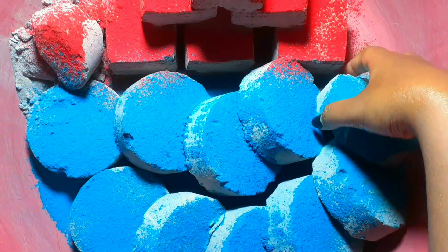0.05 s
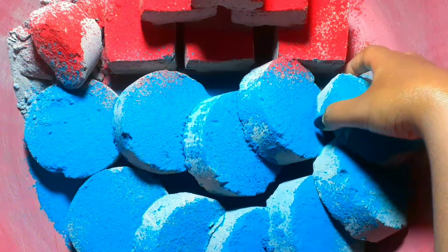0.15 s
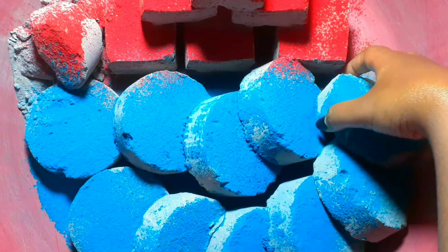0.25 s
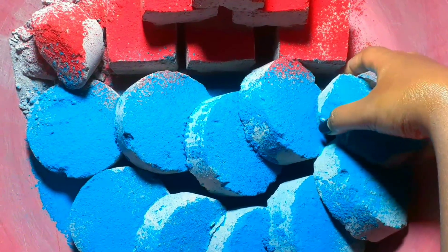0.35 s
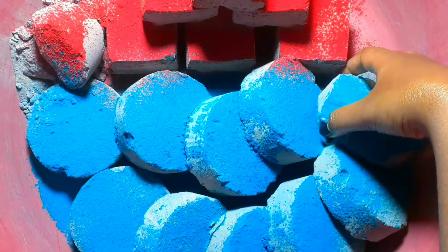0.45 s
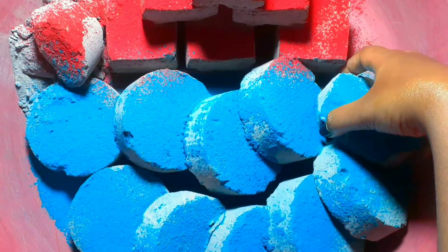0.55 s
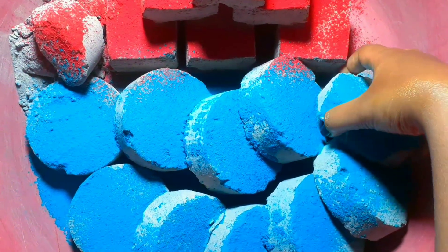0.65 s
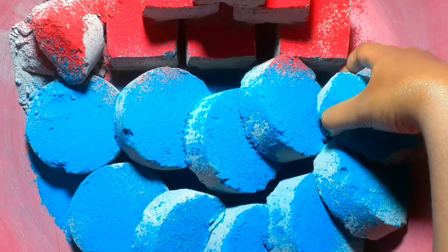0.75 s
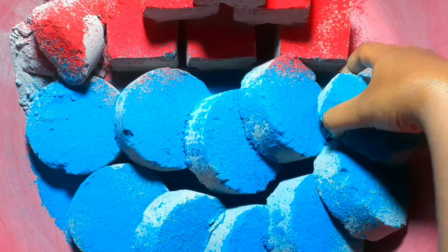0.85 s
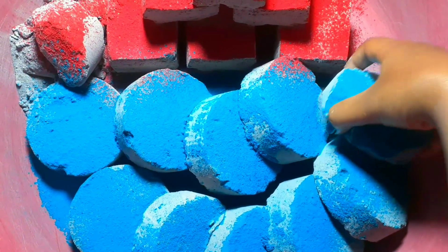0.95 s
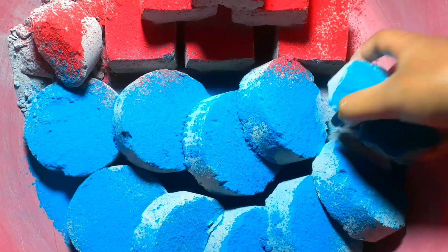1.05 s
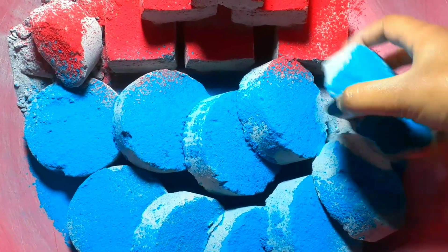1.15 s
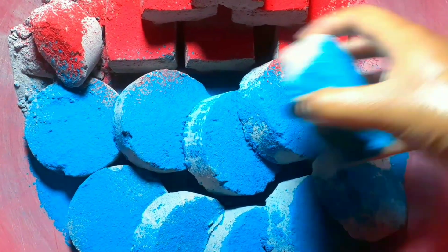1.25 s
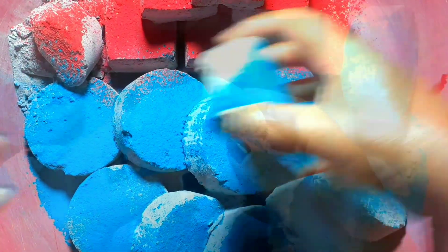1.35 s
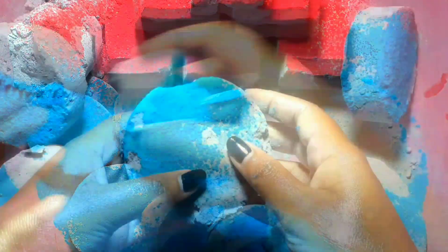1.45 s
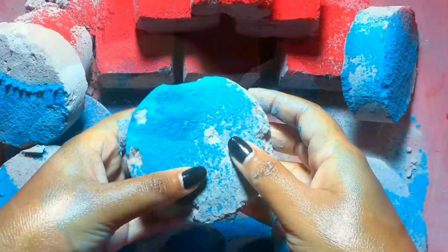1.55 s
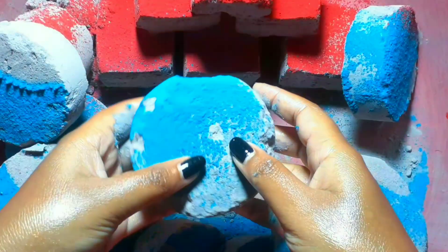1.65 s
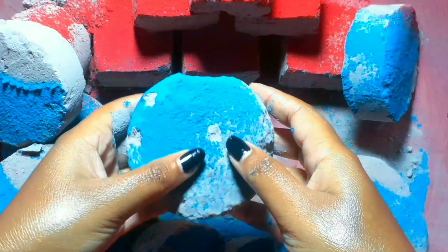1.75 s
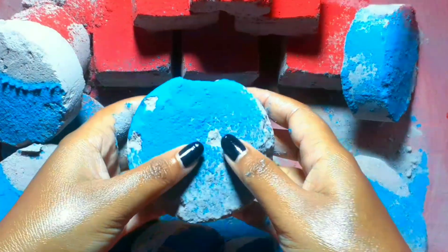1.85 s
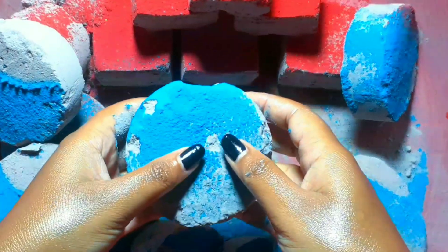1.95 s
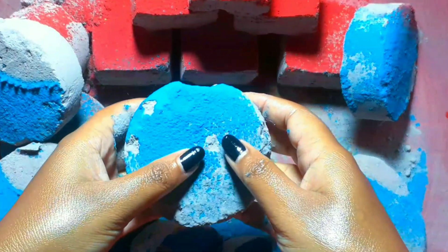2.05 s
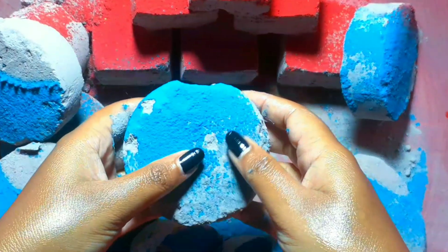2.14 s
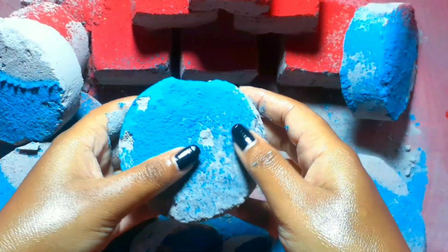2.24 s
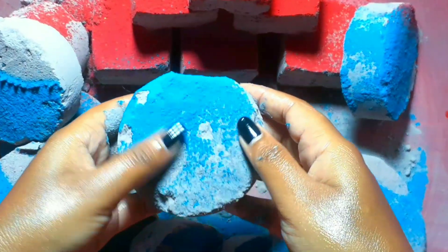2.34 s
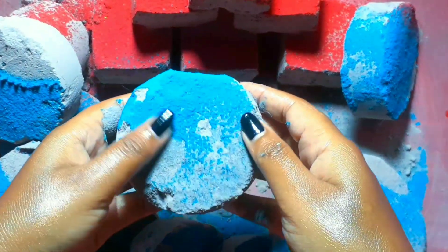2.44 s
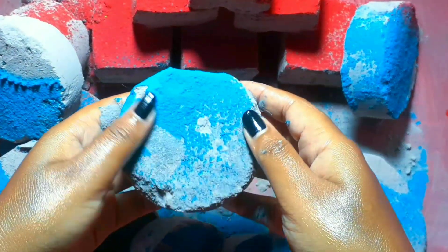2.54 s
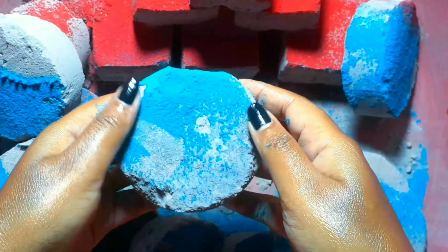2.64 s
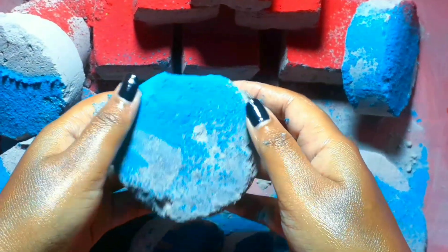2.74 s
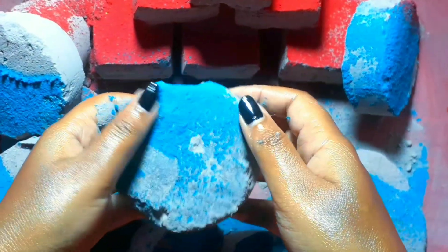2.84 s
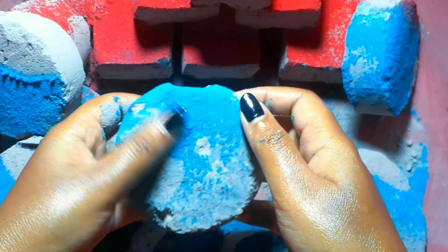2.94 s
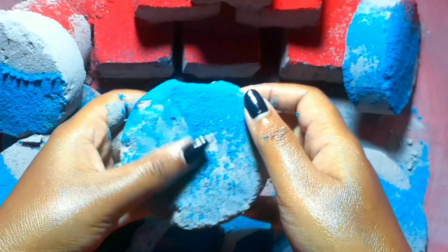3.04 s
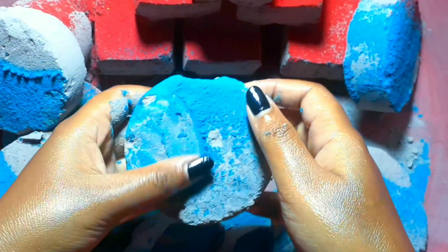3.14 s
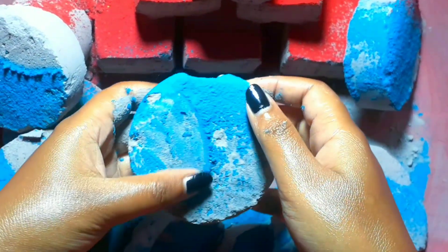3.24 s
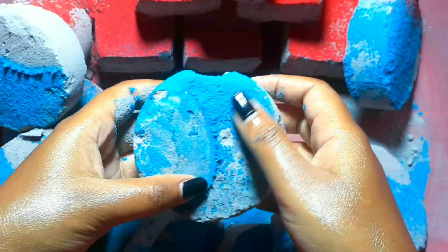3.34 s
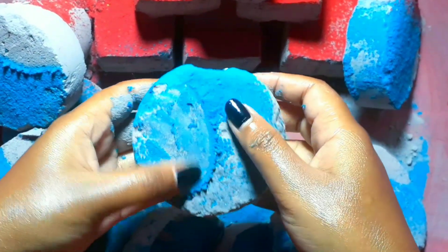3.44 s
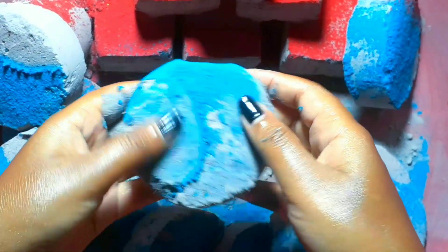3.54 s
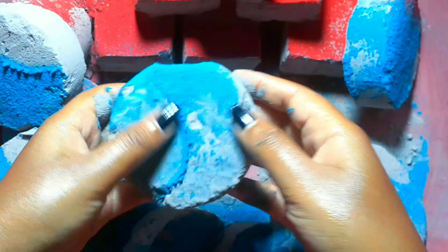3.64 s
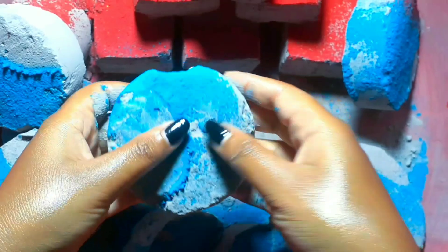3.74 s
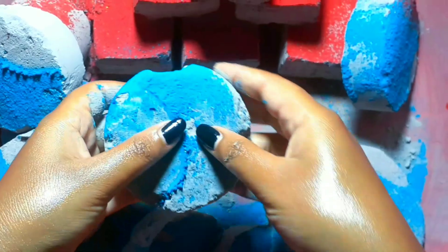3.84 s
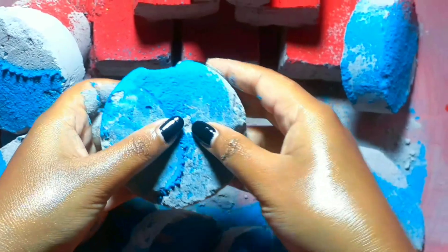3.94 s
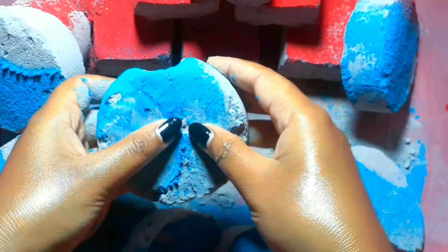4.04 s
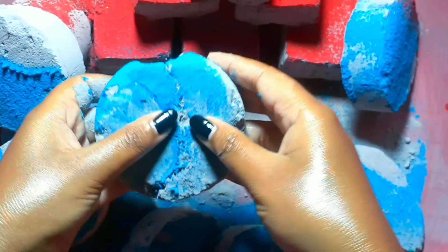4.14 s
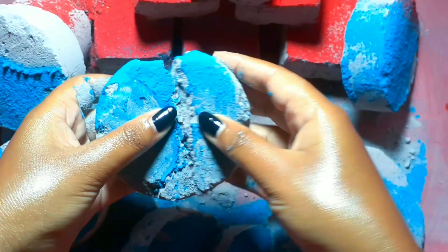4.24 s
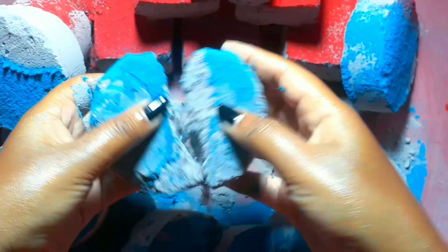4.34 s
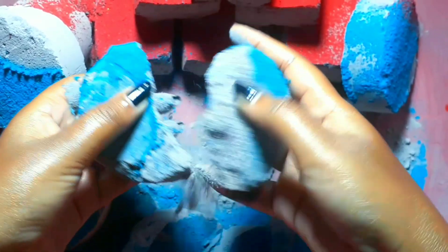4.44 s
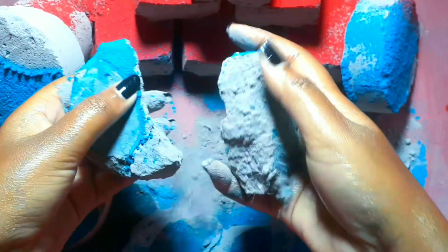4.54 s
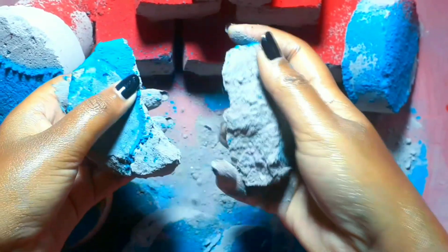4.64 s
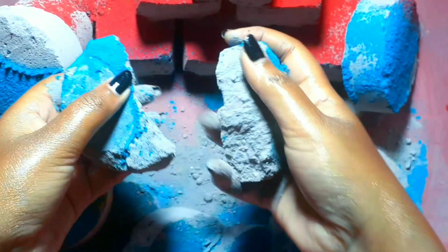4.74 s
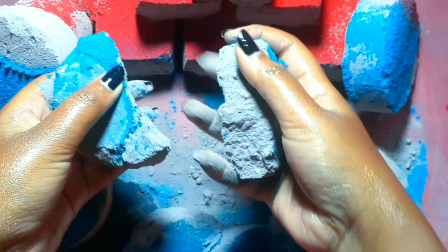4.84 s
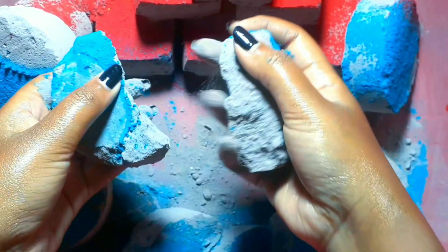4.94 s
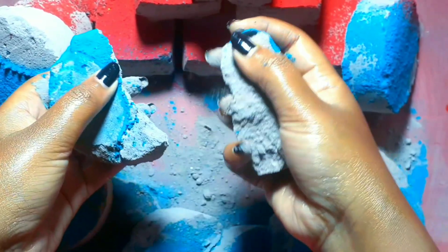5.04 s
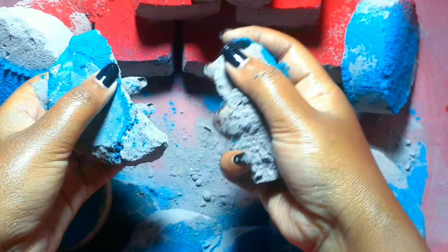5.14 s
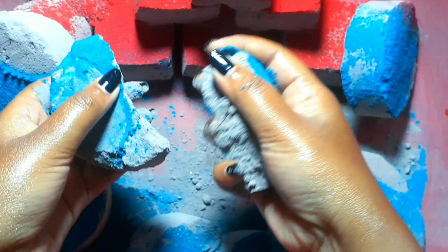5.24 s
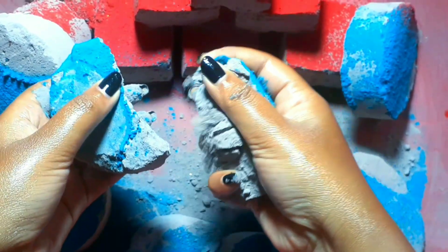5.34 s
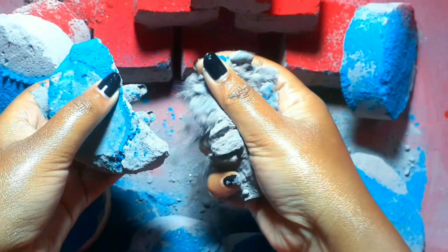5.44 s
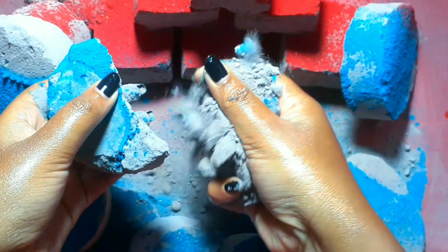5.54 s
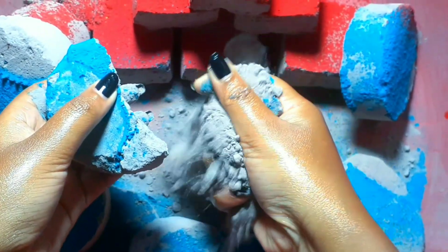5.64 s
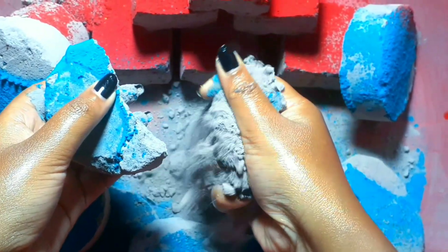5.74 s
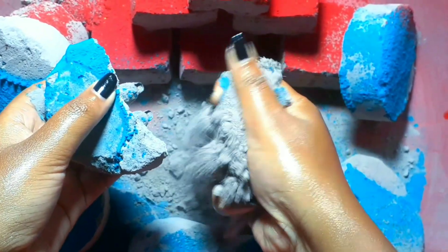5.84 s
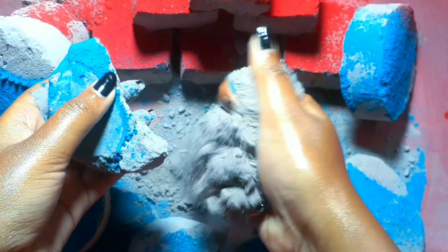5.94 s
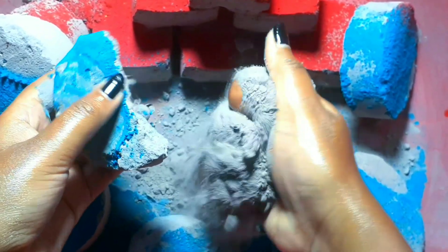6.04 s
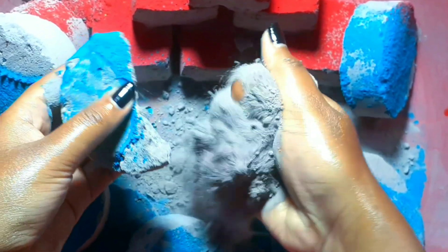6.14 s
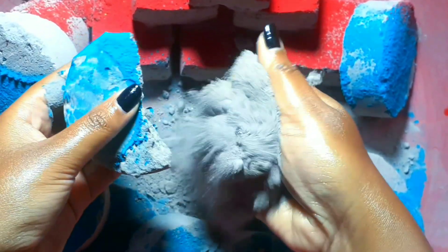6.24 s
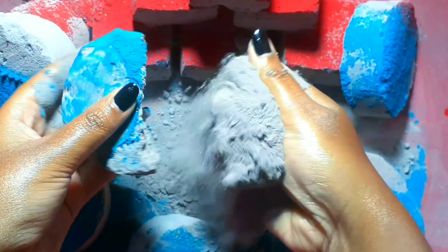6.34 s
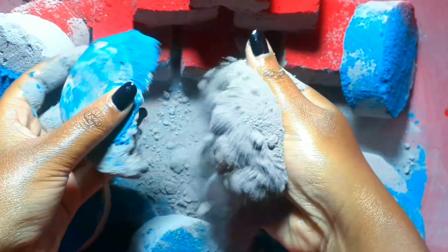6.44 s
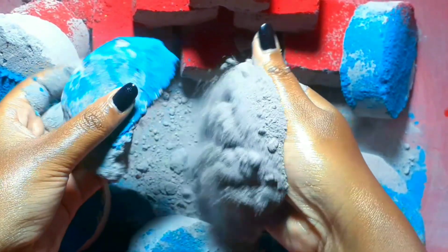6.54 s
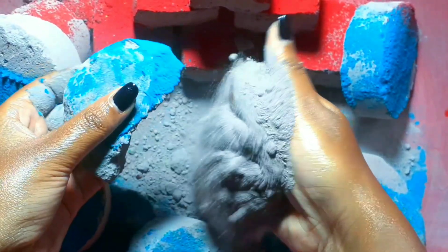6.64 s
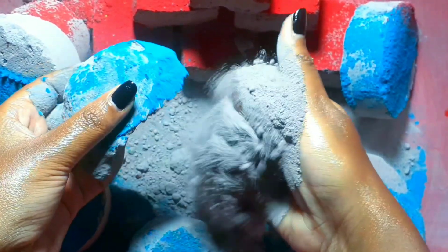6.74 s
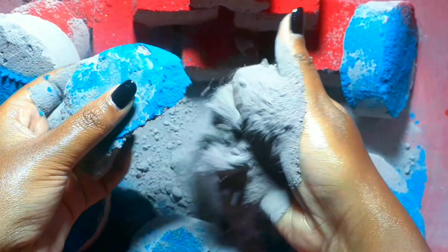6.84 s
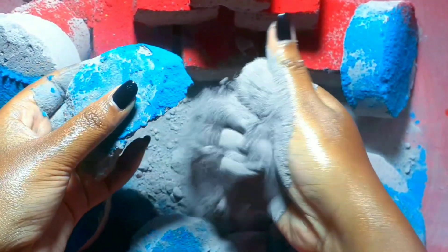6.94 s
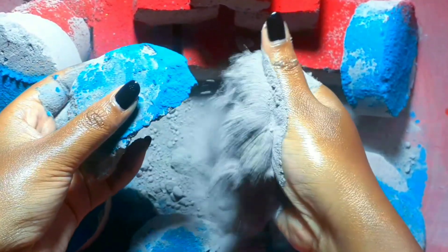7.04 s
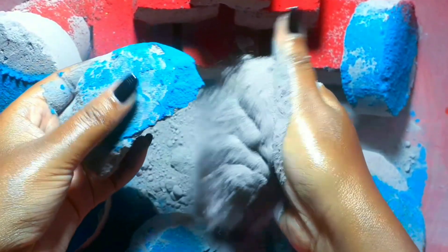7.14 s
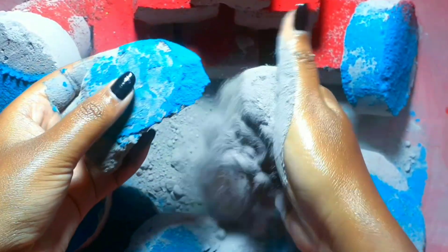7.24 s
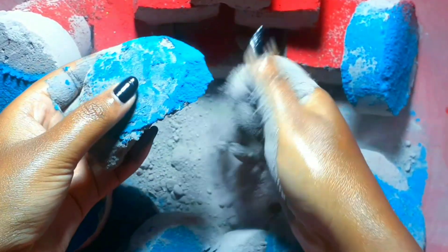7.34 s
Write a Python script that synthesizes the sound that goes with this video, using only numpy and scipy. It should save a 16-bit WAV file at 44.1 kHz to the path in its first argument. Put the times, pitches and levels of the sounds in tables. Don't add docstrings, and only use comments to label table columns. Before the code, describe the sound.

A close, dry, nearly mono handling sound with constant soft preamp hiss and a faint low table hum with tiny wrist bumps. From 0 to 0.6 s, a chalk piece is lifted: gritty scrapes, small dull cracks, crumbs drumming lightly on a hollow tray. From 0.6 to 4.2 s it is very quiet, with barely audible rubs, a small tap at 1.77 and a faint one near 3.2. At 4.35 the disc snaps, with stronger blunt cracks at 4.56 and 4.61, minor ones to 4.9 and another at 5.24. From 5.4 to 6.3 s the fist crushes a half: a dense run of mid-pitched, brittle crunches, loudest around 5.5 and 5.65, overloading into distortion, with grit and powder rushing down. A last sharp crunch lands at 6.3. Then lumps and crumbs knock and patter on the tray, with a brighter crack at 6.9, thinning until 7.4.

```python
import sys
import numpy as np
from scipy import signal
from scipy.fft import rfft, irfft
from scipy.io import wavfile
from scipy.ndimage import uniform_filter1d

SR = 44100
rng = np.random.default_rng(int(sys.argv[2]) if len(sys.argv) > 2 else 0)


def elevation(decibels):
    levels = np.asarray(decibels, float)
    return 10 ** (levels / 20)


def generate_wav(sig):
    pcm = np.round(np.clip(np.atleast_2d(sig).T, -1, 1) * 32767).astype(np.int16)
    wavfile.write(sys.argv[1], SR, pcm)


N = 325659

# start_s [s], peak_db [dB], ring_hz [Hz], thud_db [dB re peak], tick_db [dB re peak]
HANDLING_CRACKS = [(0.097, -26.5, 630, 6.5, -42), (0.226, -29.5, 635, -8, -28),
                   (0.318, -25.5, 921, -19, -16), (0.333, -31, 1660, -30, -28), (0.416, -22, 1000, 4, -18),
                   (0.483, -13.5, 1770, -21, -10), (1.503, -39.5, 600, -13, -9),
                   (1.768, -22.5, 1390, -15, -9), (2.928, -38.5, 755, -4, -3),
                   (3.187, -30, 1290, -4.5, -23), (4.245, -27.5, 1050, -25, -15),
                   (4.351, -2, 970, -12, -24.5), (4.464, -14, 1770, -8, -13), (4.561, 6, 820, -21, -23),
                   (4.614, 3, 830, -5.5, -51), (4.666, -40, 799, -28, -39), (4.798, -14.5, 1030, -7, -13),
                   (4.885, -23.5, 770, -1, -14), (5.243, -1.5, 980, -10.5, -17),
                   (5.306, -17.5, 910, -10, -43)]
# [s, dB, Hz, dB re peak, dB re peak]
CRUSH_CRACKS = [(5.422, -2.5, 796, -7.5, -19), (5.447, -12.5, 1090, -1.5, -16), (5.481, 5, 920, -10.5, -25),
                (5.512, 17.5, 734, -5.5, -19), (5.529, 0.5, 825, -7, -30), (5.567, 6.5, 640, -26, -24),
                (5.608, 2, 805, -4, -12), (5.634, 10.5, 1765, -12, -18), (5.676, 12, 790, -21, -19),
                (5.707, 4, 820, -31, -27), (5.746, 5, 810, -3.5, -38), (5.774, -5.5, 775, 5.5, -13),
                (5.796, -29, 1300, -10, -24), (5.891, 8.5, 885, -18, -10.5), (5.916, 4.5, 1710, -7, -32),
                (5.953, -6, 810, -5, -54), (5.981, -6.5, 1800, -38, -13), (6.043, -9, 1700, -3, -24),
                (6.074, -9, 620, -2.5, -11), (6.1, -7, 844, -21, -37), (6.188, -10, 705, 1, -23),
                (6.224, -9.5, 630, -3.5, -13), (6.24, -6, 1640, -10, -24), (6.303, 11, 1768, -11, -17)]
# [s, dB, Hz, dB re peak, dB re peak]
LUMP_CRACKS = [(6.329, -9, 1220, -10, -3), (6.397, -13.5, 630, -19, -12), (6.438, -22, 1550, -10, 2),
               (6.482, -27, 616, 14, -25.5), (6.549, -22.5, 1430, 3, -14), (6.588, -16, 1960, -15, -3.5),
               (6.653, -24, 627, -16, -3.5), (6.708, -21.5, 891, -6, -22), (6.741, -25, 610, -14, -21),
               (6.798, -16.5, 600, 1, -36), (6.819, -22, 651, 10, -30), (6.865, -16, 614, -30, -43),
               (6.905, -7.5, 1290, -30, -36), (6.93, -15.5, 807, -9, -8.5), (6.975, -19, 875, -16, -16),
               (7.022, -32, 816, -11, -31), (7.093, -28.5, 818, 6, -45), (7.119, -28.5, 600, 3, -6),
               (7.16, -33, 900, 16, -45), (7.216, -44, 884, -2, -15), (7.337, -25.5, 810, 2, -11),
               (7.365, -25.5, 590, 2, -18)]
CRACKS = HANDLING_CRACKS + CRUSH_CRACKS + LUMP_CRACKS
# peak_s [s], grit_db [dB], swell_s [s], fade_s [s], ring_hz [Hz]
STROKES = [(0.005, -33, 0.081, 0.23, 680), (0.111, -25.5, 0.15, 0.045, 965), (0.338, -31, 0.035, .05, 1660),
           (0.419, -33, 0.03, 0.031, 990), (0.497, -32, 0.0063, 0.06, 1660),
           (0.67, -42, 0.093, 0.079, 1670), (0.87, -46.5, 0.08, 0.05, 1830), (0.93, -39, .13, 0.1, 930),
           (1.81, -44.5, .05, .13, 1230), (2.97, -44.5, 0.22, 0.21, 1640), (3.2, -47, .015, 0.12, 1340),
           (3.25, -39.5, 0.18, 0.082, 555), (3.71, -35, .05, 0.14, 1190), (4.15, -51, 0.092, 0.22, 1440),
           (4.25, -46, 0.17, 0.05, 1280), (4.4, -36, 0.02, 0.28, 1120), (4.78, -33, 0.081, 0.19, 1200),
           (5.65, -21, 0.26, 0.13, 1180), (5.763, -7.5, 0.09, 0.058, 765), (6.06, -16, 0.079, 0.062, 1406),
           (6.291, -9, 0.015, 0.022, 960), (6.31, -14, .01, 0.11, 990), (6.81, -36.5, 0.9, 0.34, 920),
           (6.93, -24.5, 0.1, 0.16, 1425), (7.17, -34.5, 0.14, 0.14, 750)]
# time_s [s], flow_db [dB]
POUR = [(0, -31), (0.11, -23.5), (0.18, -41.5), (0.29, -39), (0.34, -32.5), (0.42, -34), (0.58, -64),
        (5.4, -53), (5.6, -10.5), (5.9, -25), (6.47, -25.5), (6.6, -31), (6.9, -23.5), (7.04, -33.5),
        (7.17, -27), (7.31, -42)]
# freq_hz [Hz], density_db [dB per Hz]
CHALK_SPECTRUM = [(290, -38.5), (500, -7.5), (680, -10), (810, -7), (960, -9.5), (1380, -5), (1800, -2.5),
                  (2050, -10.5), (2450, -16.5), (2900, -14), (3600, -48), (7000, -100)]
# freq_hz [Hz], width_hz [Hz], level_db [dB]
HEAP_RINGS = [(630, 30, -0.5), (809.4, 14.6, -2), (885, 36, 1.5), (1114, 680, 5.5), (1430, 540, 2.5),
              (1674, 60, -31)]
# freq_hz [Hz], width_hz [Hz], level_db [dB]
TRAY_RINGS = [(400.2, 25.6, -3), (454, 46, -8), (506, 20.4, -9.5), (320, 200, -3)]
# freq_hz [Hz], density_db [dB per Hz]
DUST_SPECTRUM = [(1500, -20), (2100, 3.5), (2700, -6), (3500, -8), (5000, -7.5), (8000, -16.5),
                 (15000, -36.5)]
# time_s [s], hum_db [dB]
LEAN = [(0.05, -31.5), (0.62, -44), (0.76, -34.5), (1.4, -47.5), (1.81, -40.5), (2.01, -46.5),
        (2.43, -37.5), (2.94, -41.5), (3.5, -38.5), (3.9, -43), (4.4, -38.5), (4.9, -35.5), (5.18, -43),
        (5.6, -26.5), (5.655, -11.5), (5.73, -27.5), (6.5, -36), (7.38, -36)]
# time_s [s], bump_db [dB]
NUDGES = [(0.13, -32), (0.5, -37), (0.8, -40.5), (2.47, -41), (3.1, -39), (3.47, -38.5), (5.74, -31.5),
          (6.27, -40), (6.56, -39.5), (6.82, -41), (7.2, -39.5)]
# freq_hz [Hz], density_db [dB per Hz]
HUM_SPECTRUM = [(12, -83), (20, -21.5), (43, -26), (103, -5), (151, -7.5), (184, -1.5), (216, -8),
                (313, -16), (369, -14), (410, -32.5), (448, -29), (700, -33), (910, -80), (1540, -120)]
# freq_hz [Hz], density_db [dB per Hz]
HISS_SPECTRUM = [(290, -5.5), (500, -6), (553, -5), (577, 3), (639, -3), (916, -3.5), (1200, -3.5),
                 (2660, -7.5), (4940, -4), (6400, 2), (8410, 2), (15600, -10)]
# [dB, side minus mid]
HISS_SIDE = [(60, -25), (130, -18), (290, -4), (640, -8.5), (1410, -7), (3100, -4), (6820, -5.5),
             (15000, -3)]

EVEN_HZ = 1350


def cracks():
    out = np.zeros(N)
    t = np.arange(3000) / SR
    swell_s = 0.002
    aftershocks = elevation(-12 - 60 * t / 0.07) * (1 - np.exp(-t / 0.005))
    for start_s, peak_db, ring_hz, thud_db, tick_db in CRACKS:
        a, b = rng.standard_normal((2, len(t)))
        stop_s = 3.52 / 700 * np.exp(0.15 * rng.standard_normal())
        run = (1 - np.exp(-(t / swell_s) ** 2)) * np.exp(-(t / stop_s) ** 4)
        breaks = a * (run + aftershocks)
        ring = evened(resonate_twice(breaks, ring_hz, 370.0))
        piece = evened(chalk(breaks, ring_db=-19.0)) + 0.83 * ring
        thud = tray(b * np.interp(t / 1.35, t, run))
        tick = colour(b * run ** 2.1, DUST_SPECTRUM)
        for part, part_db in ((piece, 0), (thud, thud_db), (tick, tick_db)):
            add(out, start_s - swell_s, elevation(peak_db + part_db) * part / abs(part).max())
    return out


def chalk(x, ring_db):
    rings = sum(elevation(db + ring_db) * resonate(x, hz, width_hz) for hz, width_hz, db in HEAP_RINGS)
    return colour(x + rings, CHALK_SPECTRUM)


def tray(x):
    ring = sum(elevation(db) * resonate(x, hz, width_hz) for hz, width_hz, db in TRAY_RINGS)
    return signal.sosfilt(signal.butter(2, [260, 620], "bandpass", fs=SR, output="sos"), ring)


def crumbling():
    grit_db, bright_db, crumbs_db, dust_db = crumble_controls()
    grit = grains(per_s=5000, spread_db=1.5, clump_db=2.0)
    crumbs = grains(per_s=500, spread_db=-1.0, clump_db=0.5)
    rings = sum(resonate(grit * elevation(db + 2 * slow(3.0)), hz, width_hz) for hz, width_hz, db in HEAP_RINGS)
    body = colour(grit + rings, CHALK_SPECTRUM)
    coarse = low_pass(body, 1150)
    fine_share = 1 / (1 + elevation(-2 * bright_db))
    scrape = np.sqrt(1 - fine_share) * evened(coarse) + np.sqrt(fine_share) * evened(body - coarse)
    dust = evened(colour(grit, DUST_SPECTRUM))
    patter = evened(tray(crumbs))
    mix = scrape * elevation(grit_db) + dust * elevation(dust_db) + patter * elevation(crumbs_db) + rub_rings(grit)
    return lull(depth_db=8, lead_s=0.018) * mix


def crumble_controls():
    t = control_times()
    start_s, peak_db, crack_hz, thud_db, tick_db = np.transpose(CRACKS)[:, :, None]
    _, rub_db, _, _, rub_hz = np.transpose(STROKES)[:, :, None]

    since_s = np.maximum(t - start_s, 0)
    dying = elevation(-120 * since_s) + elevation(-5.5 - 600 * since_s)
    rise = np.minimum(since_s / 0.0064, 1)
    creak = (t < start_s) * elevation(2 - 2200 * np.maximum(start_s - t, 0))
    shed_db = 0.9732 * peak_db - 23 - 1.5 * np.log2(crack_hz / EVEN_HZ)
    shed = elevation(shed_db) * (dying * rise + creak)
    power = np.vstack([shed, elevation(-1.5) * strokes(t)]) ** 2

    bright_db = 8.5 * np.log2(np.vstack([crack_hz, rub_hz]) / EVEN_HZ)
    fine_share = 1 / (1 + elevation(-2 * bright_db))
    to_crumbs_db = np.vstack([-6.5 + 0.59 * thud_db, np.full_like(rub_db, -14)])
    to_dust_db = np.vstack([-3.5 + 0.74 * tick_db, -4.5 + 1.4 * rub_db])

    still = elevation(2 * -70) / 2
    fine = (power * fine_share).sum(0) + still
    coarse = (power * (1 - fine_share)).sum(0) + still
    flow = elevation(2 * np.interp(t, *np.transpose(POUR)))
    crumbs = (power * elevation(2 * to_crumbs_db)).sum(0) + flow + elevation(2 * -63)
    dust = (power * elevation(2 * to_dust_db)).sum(0) + elevation(2 * -70)
    powers = (fine + coarse, fine / coarse, crumbs, dust)
    return [np.interp(np.arange(N) / SR, t, 10 * np.log10(p)) for p in powers]


def strokes(t):
    peak_s, grit_db, swell_s, fade_s, _ = np.transpose(STROKES)[:, :, None]
    away = np.where(t < peak_s, (peak_s - t) / swell_s, (t - peak_s) / fade_s)
    return elevation(grit_db - 20 * away ** 1.22)


def rub_rings(grit):
    t = control_times()
    out = np.zeros(N)
    for (*_, ring_hz), gain in zip(STROKES, strokes(t)):
        ring = resonate_twice(grit, ring_hz, 0.35 * ring_hz)
        out += evened(ring) * np.interp(np.arange(N) / SR, t, gain)
    return elevation(-2) * out


def lull(depth_db, lead_s):
    t = np.arange(N) / SR
    start_s = np.array([row[0] for row in CRACKS] + [np.inf])
    ahead_s = start_s[np.searchsorted(start_s, t)] - t
    return elevation(-depth_db * uniform_filter1d(np.exp(-ahead_s / lead_s), 90))


def grains(per_s, spread_db, clump_db):
    size = elevation(spread_db * np.minimum(rng.exponential(1, N), 4)) * rng.standard_normal(N)
    hits = rng.random(N) < per_s / SR
    return evened(size * hits * elevation(clump_db * slow(20.0)))


def background():
    hum_db, hiss_db, bumps_db = room_controls()
    a, b, c = rng.standard_normal((3, N))
    drone = colour(a, HUM_SPECTRUM)
    deep = low_pass(drone, 105)
    hum = evened(drone - deep) * elevation(hum_db - 1 + 2 * slow(20.0)) + evened(deep) * elevation(bumps_db)
    hiss = evened(colour(b, HISS_SPECTRUM)) * elevation(hiss_db - 0.1)
    hz = np.fft.rfftfreq(N, 1 / SR)
    gain = elevation(read(HISS_SPECTRUM, hz))
    side_gain = gain * elevation(read(HISS_SIDE, hz)) / np.sqrt(np.mean(gain ** 2))
    side = irfft(rfft(c) * side_gain, N) * elevation(hiss_db + 2)
    side += elevation(-42) * np.roll(hum, 3000)
    return hum + hiss + side * np.array([[1], [-1]])


def room_controls():
    t = np.arange(N) / SR
    hum_db = np.interp(t, *np.transpose(LEAN))
    dip_db = -3 * np.exp(-((t - 1.46) / 0.24) ** 4)
    hiss_db = -45 + 0.23 * (hum_db - hum_db.mean()) + dip_db
    bumps_db = np.max([db - 53 * abs(t - s) for s, db in NUDGES], axis=0)
    return hum_db, hiss_db, np.maximum(bumps_db, -50)


def control_times():
    return np.arange(0, N + 32, 32) / SR


def evened(x):
    return x / np.sqrt(np.mean(x ** 2) + 1e-20)


def read(points, hz):
    f, value = np.transpose(points)
    return np.interp(np.log(hz + 1), np.log(f + 1), value)


def add(mix, start_s, sound):
    part = mix[round(start_s * SR):][:len(sound)]
    part += sound[:len(part)]


def colour(x, points):
    gain_db = read(points, abs(np.fft.fftfreq(8192, 1 / SR)))
    log_gain = np.log(elevation(np.maximum(gain_db, -100)))
    taps = np.fft.ifft(np.exp(np.conj(signal.hilbert(log_gain)))).real[:4096]
    return signal.oaconvolve(x, taps / np.linalg.norm(taps))[:len(x)]


def low_pass(x, hz):
    return signal.sosfiltfilt(signal.butter(3, hz, fs=SR, output="sos"), x)


def resonate(x, hz, width_hz):
    r = np.exp(-np.pi * width_hz / SR)
    poles = [1, -2 * r * np.cos(2 * np.pi * hz / SR), r * r]
    return signal.lfilter([1, 0, -1], poles, x) * np.sqrt((1 - r * r) / 2)


def resonate_twice(x, hz, width_hz):
    return resonate(resonate(x, hz, width_hz), hz, width_hz)


def slow(rate_hz):
    steps = rng.standard_normal(N // 64 + 2)
    hz = np.fft.rfftfreq(len(steps), 64 / SR)
    smooth = irfft(rfft(steps) / (1 + (hz / rate_hz) ** 4), len(steps))
    return np.interp(np.arange(N) / 64, np.arange(len(steps)), evened(smooth))


def scene():
    hands = cracks() + crumbling()
    askew = elevation(-96) * np.roll(hands, 40) * np.array([[1], [-1]])
    return hands + askew + background()


def top_cut(x):
    return signal.sosfilt(signal.butter(12, 15780, fs=SR, output="sos"), x)


def record(dry):
    mix = np.clip(dry, -0.992, 0.992)
    return top_cut(mix)


dry = scene()
out = record(dry)
generate_wav(out)
```